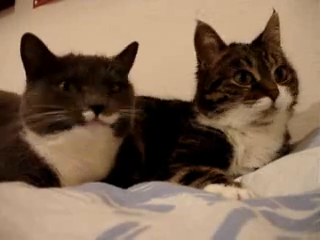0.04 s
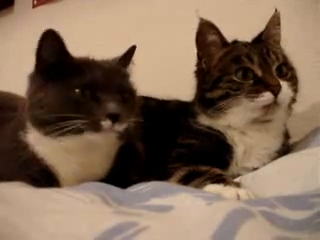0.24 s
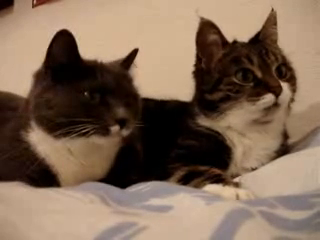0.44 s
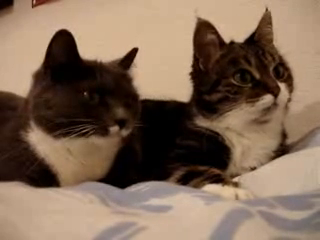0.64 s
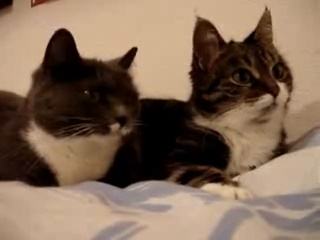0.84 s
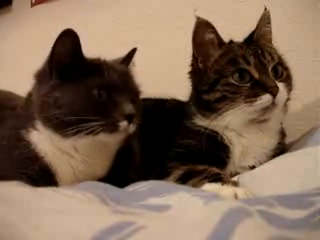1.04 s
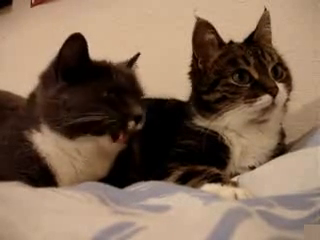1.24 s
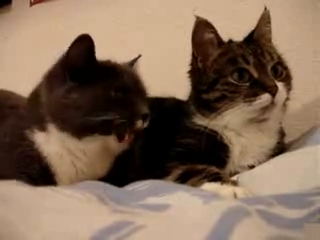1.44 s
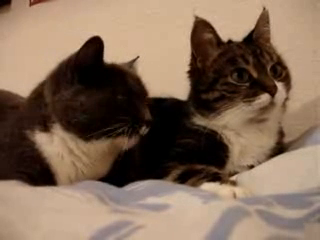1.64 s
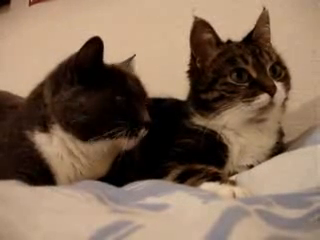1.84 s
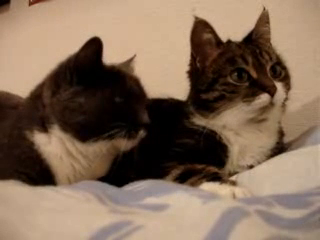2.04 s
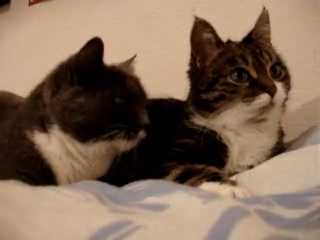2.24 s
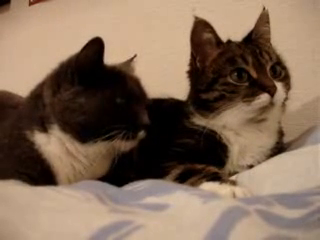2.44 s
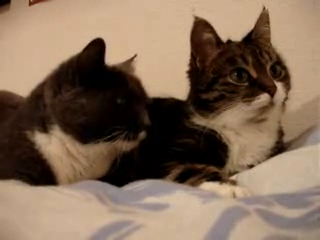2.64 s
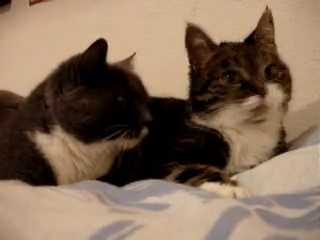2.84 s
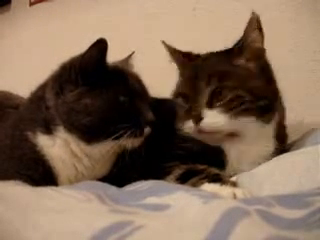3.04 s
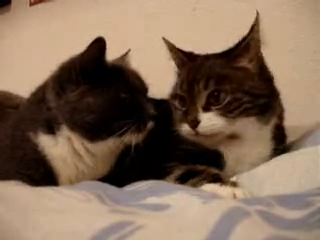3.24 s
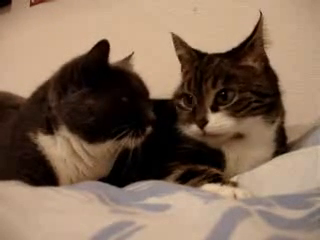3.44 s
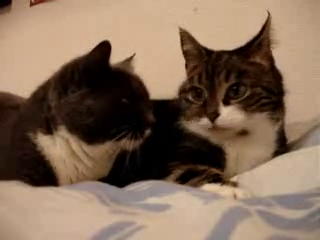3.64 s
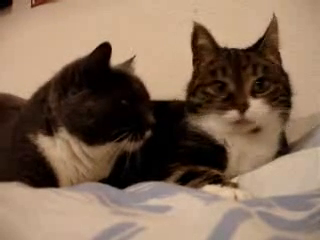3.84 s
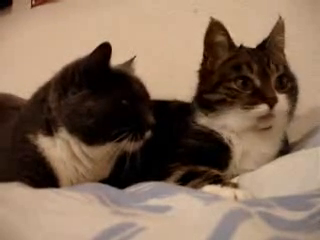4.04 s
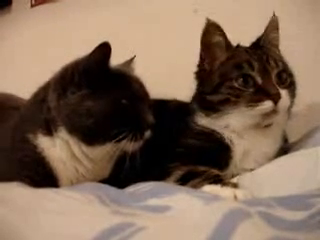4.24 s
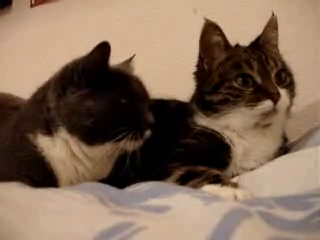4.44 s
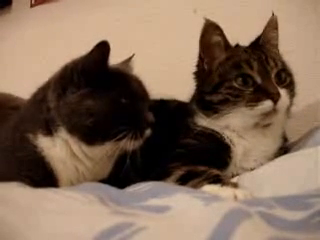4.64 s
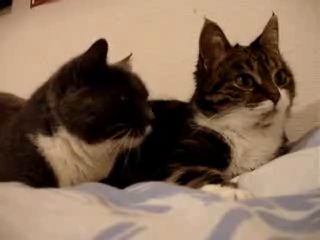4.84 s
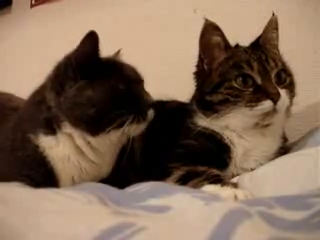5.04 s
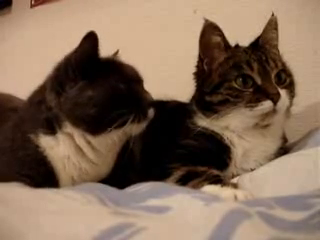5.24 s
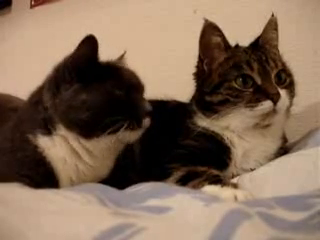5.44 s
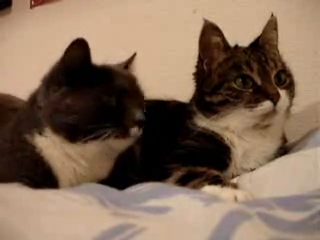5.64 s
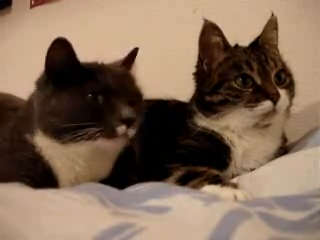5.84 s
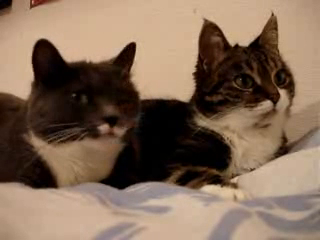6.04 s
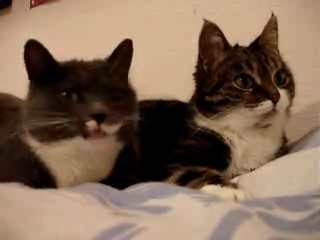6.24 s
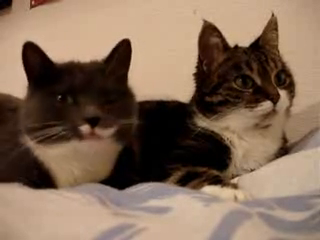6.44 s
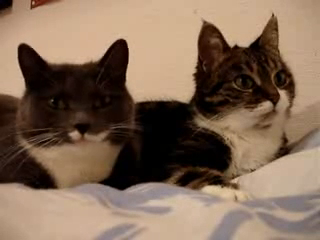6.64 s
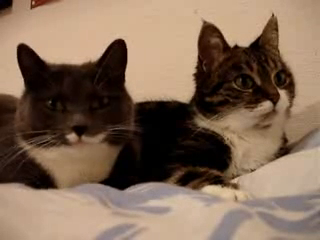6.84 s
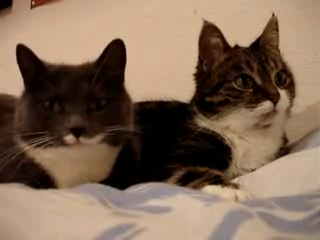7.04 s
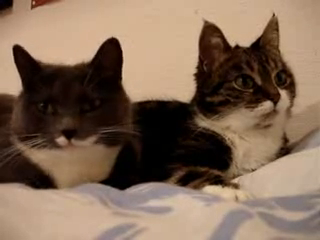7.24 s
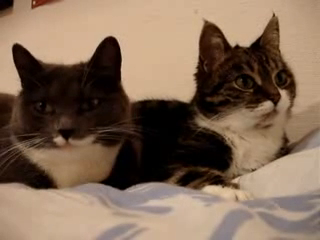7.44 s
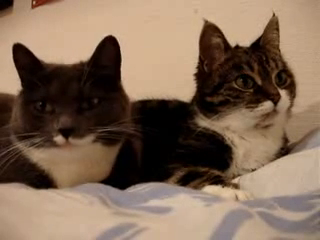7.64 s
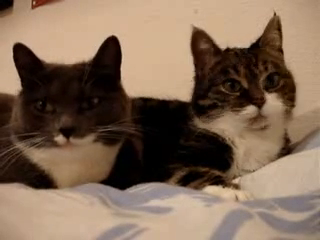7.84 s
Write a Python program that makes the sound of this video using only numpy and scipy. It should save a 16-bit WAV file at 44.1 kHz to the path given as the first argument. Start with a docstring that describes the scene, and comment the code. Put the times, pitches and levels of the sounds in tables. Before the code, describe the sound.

Two cats in a quiet bedroom trade fluttering trills and short falling chirps, with a camera click early on and faint hiss underneath.

```python
"""A quiet room with a bed, where two cats call in fluttering trills and clear, mostly falling chirps.
Each call is a stack of harmonics shaped by a throat colour, with breath noise puffing once a cycle.
Small ticks, creaks and a short grunt from mouth and throat are brief ringing noise bursts.
The camera's case clicks in the hand as decaying modes, with a rattle and, on the last click, a thump.
Under it lie shaped room noise and hiss, with mains hum and the camera's whine as steady tones."""
import sys
import numpy as np
from scipy import signal
from scipy.fft import rfft, irfft, next_fast_len
from scipy.io import wavfile
from scipy.ndimage import map_coordinates

SR = 44100
rng = np.random.default_rng(int(sys.argv[2]) if len(sys.argv) > 2 else 0)


def wrap_up_sound(samples):
    """Save the sound to the file named by the first command line argument, as 16-bit audio."""
    columns = np.atleast_2d(samples).T
    # keep every value between -1 and 1, then stretch to whole-number steps
    tamed = np.clip(columns, -1, 1)
    steps = np.round(tamed * 32767).astype(np.int16)
    wavfile.write(sys.argv[1], SR, steps)


N = 349272

# Colour of room noise and hiss: pitch_hz [Hz], level_db [dB per Hz, relative]
AIR_COLOUR = [(12, -40.5), (20, -4.5), (49, -9.5), (91, -10), (224, -2), (380, -3.5), (410, 1.5), (454, -4),
              (732, -9), (809, -8.5), (873, -10), (3310, -17), (7050, -20), (7600, -15.5), (8200, -24),
              (10700, -65.5), (18000, -120)]
# Mains hum and camera whine: pitch_hz [Hz], level_db [dB rms]
STEADY_TONES = [(60, -78.5), (120, -82.5), (180, -73.5), (217, -72), (240, -71.5), (360, -71.5), (742, -75),
                (7622, -77), (7651, -76), (7682, -86)]
AIR_LEVEL_DB = -55.46
LOW_NOISE_START_DB, LOW_NOISE_END_DB = 2.15, -0.3  # the low room noise eases off slowly

# Hoarse moments: centre_s [s], half_length_s [s], added_rasp [0-1], period_doubling [0-1]
HOARSE_MOMENTS = [(0.127, 0.057, 0.04, 0.06), (0.444, 0.011, 0.3, 0.1), (0.467, 0.026, 0.7, 1),
                  (1.303, 0.01, 0.9, 0.2), (2.985, 0.035, 1, 0.54), (3.333, .014, 0.5, 0.05),
                  (3.368, 0.017, .2, 0.4), (6.594, 0.028, 0.9, 0.3)]
# Upper mouth resonance rising as the jaw moves:
# start_s [s], end_s [s], start_hz [Hz], end_hz [Hz], boost_db [dB]
JAW_SWEEPS = [(0.47, .56, 3350, 4840, 12), (3.336, 3.406, 2720, 5100, 7), (4.988, 5.37, 3640, 4540, 2.5)]

# Trills: start_s [s], crest_s [s], end_s [s], held_pitch_hz [Hz], settling_s [s], closing_glide_hz [Hz],
# level_db [dB], droop_db [dB, towards both ends], overtone_droop_db [dB, further],
# second_db and third_db [dB, harmonics relative to the level]
TRILL_CALLS = [(0.0, 0.178, 0.405, 525.6, 0.012, 23.5, -38, 9, 0.5, -6, -12),
               (0.949, 1.145, 1.302, 527.6, 0.022, 4, -42, 1.5, 2.5, -4.5, -13),
               (2.958, 3.11, 3.278, 551.7, 0.062, -7.5, -35.5, 10, 1, -6, -9.5),
               (4.842, 5.21, 5.41, 496.6, 0.036, -63, -39, 4, 3, -16.5, -27.5),
               (5.939, 6.11, 6.264, 483, 0.044, 39.5, -40, 4.5, -4.5, -7.5, -18.5)]
# Larynx flutter of each trill: first_dip_s [s], rate [beats/s], slowing [beats/s each s],
# steady_ending_s [s], pitch_swing [share], level_swing_db [dB], pitch_jitter [share], rasp [0-1]
TRILL_FLUTTERS = [(.008, 44.65, 12, 0, .04, 5, .023, .36), (.971, 44.65, 40, 0, .125, 3, .02, .29),
                  (2.9605, 48.9, 42, 0, .055, 8.5, .018, .22), (4.8566, 41.4, 18, 0, .21, 5, .024, .5),
                  (5.9475, 37.4, 22, .06, .17, 4.5, .014, .27)]
# Throat colour of each trill: pitch_hz [Hz], level_db [dB, relative]
TRILL_COLOURS = [
    [(1600, 4.5), (2150, 3), (2700, -12), (4200, -9), (5200, -35.5), (8000, -37.5)],
    [(1600, -3.5), (2150, 1.5), (2700, -2), (3300, -11), (4200, -19.5), (5200, -36)],
    [(1700, 1.5), (2200, -9), (2700, -15.5), (3300, -17.5), (4100, -14.5), (5200, -35.5), (8000, -33)],
    [(1500, -5), (2100, -0.5), (2700, -1.5), (3300, -16.5), (4250, -5.5), (5200, -27), (8000, -25)],
    [(1500, -1), (2100, 2.5), (2650, 0), (3300, -11), (4200, -15), (7000, -28)],
]
TRILL_ONSET_HZ = 614  # every trill starts high and settles on its held pitch
TRILL_GLIDE_S = 0.16  # length of the closing glide
TRILL_ATTACK_S, TRILL_RELEASE_S = 0.012, 0.025
TRILL_WANDER = 0.012  # share by which the pitch wanders
FLUTTER_ONSET_S, FLUTTER_STOP_S = 0.06, 0.023  # the flutter grows in and dies away
FLUTTER_SPREAD = 0.3  # share by which the beats differ in depth
FLUTTER_STAGGER = 0.07  # beats by which the dips come early or late

# Pitch of each chirp: time_s [s], pitch_hz [Hz]
CHIRP_GLIDES = [
    [(0.0, 743), (0.034, 707), (0.126, 649.6), (0.134, 655.7), (0.168, 590), (0.18, 538.2), (0.185, 531.5)],
    [(0.427, 636.2), (0.477, 633.9), (0.519, 620), (0.549, 673), (0.559, 600), (0.582, 503.9)],
    [(1.547, 752.6), (1.629, 729), (1.645, 780)],
    [(1.635, 776), (1.649, 773), (1.715, 747), (1.837, 695.0), (1.879, 633), (1.907, 530), (1.922, 534)],
    [(3.315, 609), (3.341, 667.5), (3.383, 698), (3.405, 631), (3.461, 592), (3.487, 595.5), (3.522, 609)],
    [(6.333, 644), (6.417, 636.4), (6.535, 578), (6.549, 526), (6.573, 562), (6.589, 478), (6.615, 476),
     (6.63, 507.8)],
]
# Chirps: attack_s [s], mouth_shuts_s [s], opening_overtone_accent_db [dB],
# starting levels of harmonics 1, 2, 3 [dB], their drifts [dB per s]
CHIRP_CALLS = [(0.00095, 0.185, 3.9, -36.5, -46.5, -39.5, -78, -8, -39),
               (0.016, 0.562, 0.5, -42, -41.5, -59, 22, -69, 38),
               (0.006, 1.65, 0.5, -40, -42.5, -48, -50, -45, -83),
               (0.0072, 1.888, 2, -41.5, -53, -47, -34, -22, -74),
               (0.022, 3.52, 0.5, -41, -46.5, -49.5, 16, -62.5, -71),
               (0.003, 6.543, 3.7, -59.5, -48.5, -47, 60, 3, -29)]
# Throat colour of each chirp: pitch_hz [Hz], level_db [dB, relative]
CHIRP_COLOURS = [
    [(2050, -2.5), (2730, -10), (3400, -12), (4100, -13.5), (4800, -29), (5800, -27.5), (8000, -31)],
    [(1900, 2.5), (2530, 1.5), (3170, -0.5), (4430, -13.5), (5100, -16), (5700, -30), (7000, -27)],
    [(2250, 5), (3000, 3.5), (3750, -7), (5250, -17), (6000, -10), (6750, -8.5), (7500, -50)],
    [(2250, 6.5), (3000, -2), (3750, -6), (5250, -27), (6500, -26), (7500, -44)],
    [(1900, 1), (2550, -5.5), (3800, -14), (4400, -18), (5100, -12), (5700, -27), (6400, -29)],
    [(1900, 6.5), (2480, 0.5), (3100, -9), (3700, -10.5), (4330, -40), (5000, -47.5)],
]
# Roughness of each chirp: pitch_jitter [share], rasp [0-1]
CHIRP_ROUGHNESS = [(.018, .22), (.014, .13), (.003, .04), (.004, .04), (.011, .1), (.003, .05)]
CHIRP_RELEASE_S = 0.015
CHIRP_ACCENT_S = 0.023  # time constant of the opening accent
SHUT_S, SHUT_DB = 0.018, 6  # as the mouth shuts, harmonics from the third up drop this fast and this far
SHUT_FADE_DB_PER_S = 88  # from then on all overtones fade
CREAK_PER_S, CREAK_DB = 29.5, 11  # slow pulses around and after the shutting: rate and depth

# Echo decay: pitch_hz [Hz], t60_s [s]
ECHO_DECAY = [(200, 0.2), (2000, 0.49), (8000, 0.092)]

# Mouth and throat, small ticks, creaks and a short grunt:
# time_s [s], level_db [dB, before a trim], ring_hz [Hz]
MOUTH_BURSTS = [(0.395, -34, 4200), (0.433, -36.5, 640), (0.454, -30.5, 960), (0.961, -38.5, 600),
                (1.293, -32.5, 608), (1.312, -37.5, 600), (1.465, -29.5, 6030), (1.983, -40, 972),
                (2.951, -37, 610), (3.317, -41.5, 646), (6.263, -33, 600), (6.287, -37, 600),
                (6.332, -36.5, 1940), (7.345, -47, 616)]
# Colour of a burst before its ring: pitch_hz [Hz], level_db [dB, relative]
BURST_COLOUR = [(200, -41), (600, 1.5), (1200, -2), (2500, -7), (4000, -8.5), (8000, -12)]

# Case clicks: time_s [s], level_db [dB, before trims], thump_db [dB, before its envelope]
CASE_CLICKS = [(1.7761, -10.5, -76), (1.837, -33.5, -78), (1.8790, -21.5, -29)]
# Ringing modes of the plastic case: pitch_hz [Hz], level_db [dB, relative], t60_s [s]
CASE_MODES = [(1016, -1, 0.027), (1473, -2, 0.02), (2040, 7.5, 0.012), (3030, -2, 0.014),
              (3550, -22, 0.014), (5000, -17.5, 0.016), (7100, -27.5, 0.0037)]
# Colour of the rattle after a click: pitch_hz [Hz], level_db [dB, relative]
RATTLE_COLOUR = [(200, -21), (900, 2), (2200, -3), (4000, -8), (8000, -27)]

BAND_LIMIT_HZ = 8300


def amp(db):
    """Decibels to gain."""
    return 10 ** (np.asarray(db) / 20)


def unit(x):
    """Scale to rms 1."""
    return x / np.sqrt(np.mean(x ** 2) + 1e-20)


def along(points, hz):
    """Read (Hz, value) points on a log frequency axis."""
    f, v = np.transpose(points)
    return np.interp(np.log(hz + 1), np.log(f + 1), v)


def curves(rows):
    """The times of a call's samples, then each column at those times."""
    s, *cols = np.transpose(rows)
    t = np.arange(max(round(s[0] * SR), 0), round(s[-1] * SR)) / SR
    return [t] + [np.interp(t, s, c) for c in cols]


def wobble(rate, size):
    """A smooth random curve with rate knots a second."""
    knots = rng.standard_normal(SR // 2)
    return map_coordinates(knots, [np.arange(size) * rate / SR], mode="wrap")


def filtered(x, response):
    """Shape the spectrum of x by a response of frequency."""
    m = next_fast_len(len(x) + SR // 8)
    spectrum = rfft(x, m) * response(np.fft.rfftfreq(m, 1 / SR))
    return irfft(spectrum, m)[:len(x)]


def noise(colour, size):
    """Noise of rms 1 with the given (Hz, dB) colour."""
    white = rng.standard_normal(max(size, SR))[:size]
    return unit(filtered(white, lambda hz: amp(along(colour, hz))))


def add(track, s, sound):
    """Mix a sound into the track at s seconds."""
    part = track[max(round(s * SR), 0):][:len(sound)]
    part += sound[:len(part)]


def gate(t, attack_s, release_s):
    """Attack, hold and release over the times t."""
    attack = np.clip((t - t[0]) / attack_s, 0, 1)
    return attack * np.clip((t[-1] - t) / release_s, 0, 1)


def background():
    """Hiss over low room noise that drifts slowly, with hum and whine slightly unsteady in phase."""
    t = np.arange(N) / SR
    tones = sum(amp(db) * np.sqrt(2) * np.sin(2 * np.pi * hz * t + 0.5 * wobble(3.9, N))
                for hz, db in STEADY_TONES)
    air = amp(AIR_LEVEL_DB) * noise(AIR_COLOUR, N)
    low = filtered(air, lambda hz: 1 / (1 + (hz / 700) ** 4))
    hiss = air - low
    drift_db = np.linspace(LOW_NOISE_START_DB, LOW_NOISE_END_DB, N)
    return hiss + low * amp(drift_db + 1.1 * wobble(8, N)) + tones


def jaw_sweep_db(t, hz):
    """Boost that the rising mouth resonance gives to frequencies hz at times t."""
    total_db = 0
    for start, end, from_hz, to_hz, boost_db in JAW_SWEEPS:
        centre_hz = np.interp(t, [start, end], [from_hz, to_hz])
        active = (t > start) & (t < end)
        total_db = total_db + boost_db * active * np.exp(-((hz - centre_hz) / 400) ** 2)
    return total_db


def voice(t, pitch, first_db, second_db, third_db, throat, jitter, shimmer_db, rasp):
    """Vocal folds: harmonics of an unsteady pitch, with turbulence that puffs once a cycle."""
    hoarse, doubling = sum(np.outer([r, d], np.exp(-((t - s) / half) ** 4))
                           for s, half, r, d in HOARSE_MOMENTS)
    unsteady_pitch = pitch * (1 + (jitter + 0.043 * hoarse) * wobble(450, len(t)))
    phase = 2 * np.pi * np.cumsum(unsteady_pitch) / SR

    # the throat colour is relative to the third harmonic, whose level is given
    orders = np.arange(3, 15)[:, None]
    hz = orders * pitch
    gains = amp(third_db + along(throat, hz) + jaw_sweep_db(t, hz) - along(throat, 3 * pitch))
    # the throat delays each harmonic differently
    upper = np.sum(gains * np.sin(orders * phase + orders ** 2), axis=0)
    lower = amp(first_db) * np.sin(phase) + amp(second_db) * np.sin(2 * phase)
    tone = np.sqrt(2) * (lower + upper) * amp(shimmer_db * wobble(300, len(t)))

    # alternate strong and weak cycles put lines halfway between the harmonics
    halves = 2 * amp(second_db) * np.sin(3 * phase / 2) + amp(third_db) * np.sin(5 * phase / 2)
    halves = doubling * halves

    breath_colour = [(200, -7.5), (650, -11.5), (1000, 3.5)] + [(f, 0.73 * db) for f, db in throat]
    puffs = unit(noise(breath_colour, len(t)) * (1 + np.sin(phase)))
    turbulence = (rasp + hoarse) * np.hypot(amp(second_db), 1.9 * amp(third_db)) * puffs
    return gate(t, 0.0011, 0.0011) * (tone + halves + turbulence) / np.sqrt(1 + hoarse ** 2)


def flutter(t, first_dip, rate, slowing, steady_s):
    """Rounded arches between sharp dips, about zero on average; the uneven beat slows as the call goes on."""
    age = t - first_dip
    beats = rate * age - slowing * age ** 2 / 2 + FLUTTER_STAGGER * wobble(18, len(t))
    arch = np.abs(np.sin(np.pi * beats)) - 2 / np.pi
    grow = np.clip((t - t[0]) / FLUTTER_ONSET_S, 0, 1)
    stop = np.clip((t[-1] - steady_s - t) / FLUTTER_STOP_S, 0, 1)
    return arch * grow * stop * (1 + FLUTTER_SPREAD * wobble(25, len(t)))


def trills():
    """Through a nearly closed mouth: pitch settles, and each larynx flutter dips pitch and level together."""
    track = np.zeros(N)
    for row, manner, throat in zip(TRILL_CALLS, TRILL_FLUTTERS, TRILL_COLOURS):
        start, crest, end, held_hz, settle_s, glide_hz, db, droop_db, dulling_db, second_db, third_db = row
        *pace, swing, swing_db, jitter, rasp = manner
        t, off_crest = curves([(start, -1), (crest, 0), (end, 1)])
        roll = flutter(t, *pace)

        settling = (TRILL_ONSET_HZ - held_hz) * np.exp(-((t - t[0]) / settle_s) ** 2)
        closing = glide_hz * np.clip(1 - (end - t) / TRILL_GLIDE_S, 0, 1)
        pitch = held_hz + settling + closing
        pitch = pitch * (1 + swing * roll + TRILL_WANDER * wobble(30.3, len(t)))

        level_db = db - droop_db * off_crest ** 2 + swing_db * roll
        overtone_db = level_db - dulling_db * off_crest ** 2
        call = voice(t, pitch, level_db, overtone_db + second_db, overtone_db + third_db,
                     throat, jitter, shimmer_db=1.53, rasp=rasp)
        add(track, t[0], call * gate(t, TRILL_ATTACK_S, TRILL_RELEASE_S))
    return track


def chirps():
    """Open-mouthed calls on a gliding pitch; as the mouth shuts, overtones dull and a creak pulses the level."""
    track = np.zeros(N)
    for glide, row, throat, (jitter, rasp) in zip(CHIRP_GLIDES, CHIRP_CALLS, CHIRP_COLOURS, CHIRP_ROUGHNESS):
        attack_s, shut, accent_db, *harmonics = row
        t, pitch = curves(glide)
        age = t - t[0]
        since_shut = np.maximum(t - shut, 0)

        start_db, drift = np.reshape(harmonics, (2, -1, 1))
        first_db, second_db, third_db = start_db + drift * age
        bright_db = accent_db * np.exp(-age / CHIRP_ACCENT_S) - SHUT_FADE_DB_PER_S * since_shut
        muffle_db = SHUT_DB * np.minimum(since_shut / SHUT_S, 1)

        # held at -0.5, full level, until half a pulse before the mouth shuts
        pulses = np.maximum(CREAK_PER_S * (t - shut), -0.5)
        creak = amp(-CREAK_DB * (1 - np.abs(np.sin(np.pi * pulses))) ** 2)
        call = voice(t, pitch, first_db, second_db + bright_db, third_db + bright_db - muffle_db,
                     throat, jitter, shimmer_db=0.55, rasp=rasp)
        add(track, t[0], call * creak * gate(t, attack_s, CHIRP_RELEASE_S))
    return track


def room_echo(x):
    """The soft furnishings leave a short dull echo: noise dying at its own rate in each band."""
    hz, t, z = signal.stft(rng.standard_normal(SR // 3), SR, nperseg=256)
    decay = amp(-60 * t / along(ECHO_DECAY, hz)[:, None])
    tail = signal.istft(z * decay, SR, nperseg=256)[1]
    delayed = np.pad(tail, (SR // 200, 0))  # 5 ms before the echo begins
    return signal.fftconvolve(x, delayed / np.linalg.norm(tail))[:N]


def mouth_bursts():
    """Mouth and throat: small ticks, creaks and a short grunt, each a brief ringing burst."""
    track, t = np.zeros(N), np.arange(SR // 16) / SR
    for s, db, ring_hz in MOUTH_BURSTS:
        raw = noise(BURST_COLOUR, len(t))
        burst = unit(filtered(raw, lambda hz: 1 + 2.3 / (1 + ((hz - ring_hz) / 450) ** 2)))
        add(track, s, amp(db - 7 - 60 * t / 0.014) * burst)
    return track


def clicks():
    """The plastic case snaps and rattles briefly; the last of the clicks also thumps the microphone."""
    track, t = np.zeros(N), np.arange(SR // 8) / SR
    for s, db, thump_db in CASE_CLICKS:
        ring = sum(amp(level - 60 * t / t60) * np.cos(2 * np.pi * hz * t) for hz, level, t60 in CASE_MODES)
        ring = ring * (1 - np.exp(-t / 0.0005))  # soften the very first instant
        rattle = noise(RATTLE_COLOUR, len(t)) * amp(-60 * t / 0.024)
        thump = (1 - t / 0.012) * np.exp(-t / 0.013) * (1 - np.exp(-t / 0.0012))
        add(track, s, amp(db - 7.5) * ring)
        add(track, s + 0.00084, amp(db - 8.5) * rattle)
        add(track, s, amp(thump_db) * thump)
    return track


def scene():
    """The cats with their echo in the room, the clicks dry at the microphone, all over the background."""
    cats = trills() + chirps() + mouth_bursts()
    echo = amp(-19) * room_echo(cats)
    return (cats + echo + clicks() + background())[None]


def record(dry):
    """The camera keeps nothing above its band limit."""
    return filtered(dry[0], lambda hz: hz < BAND_LIMIT_HZ)[None]


dry = scene()
out = record(dry)
wrap_up_sound(out)
```